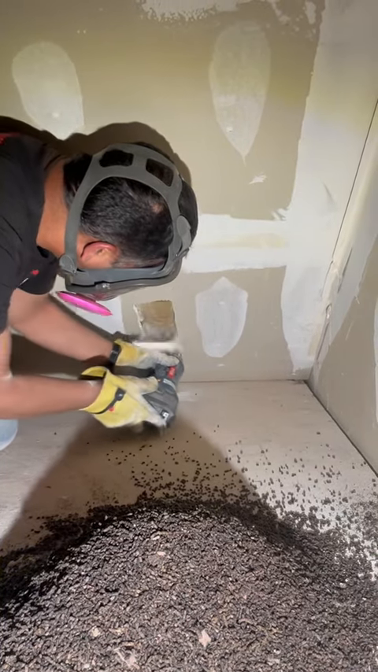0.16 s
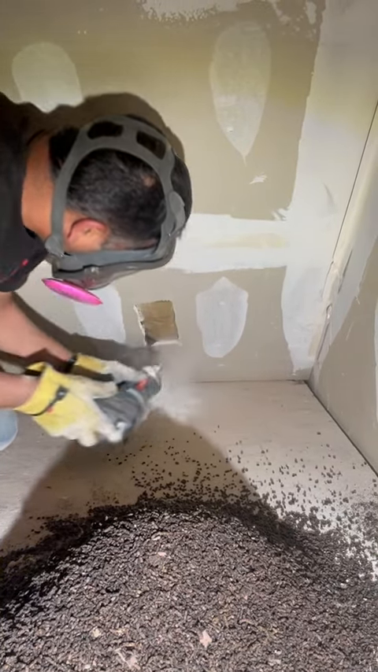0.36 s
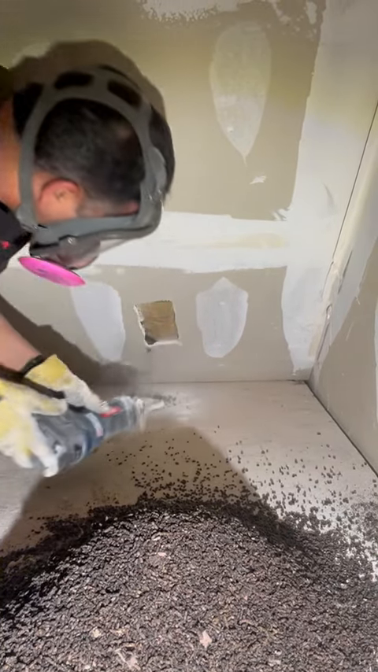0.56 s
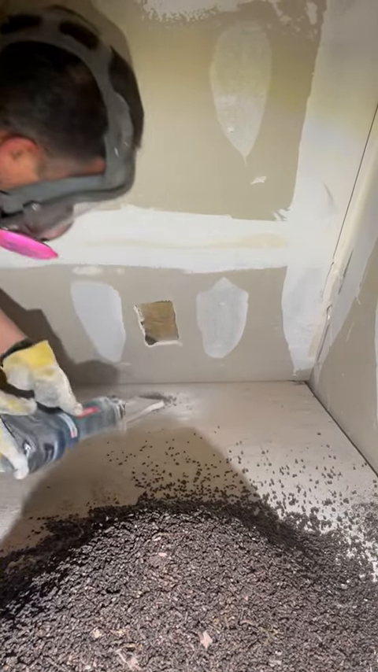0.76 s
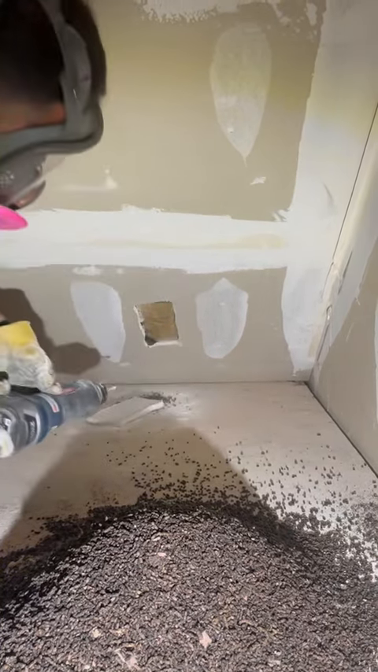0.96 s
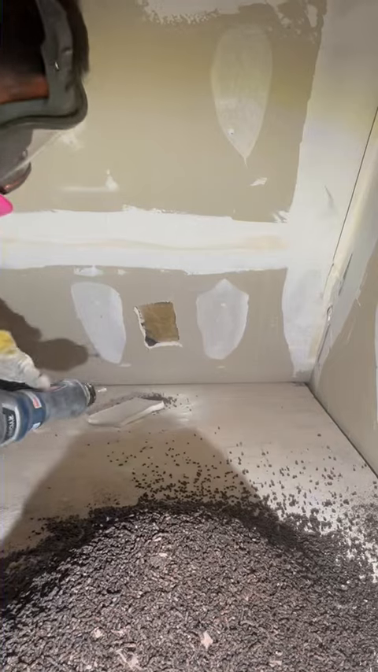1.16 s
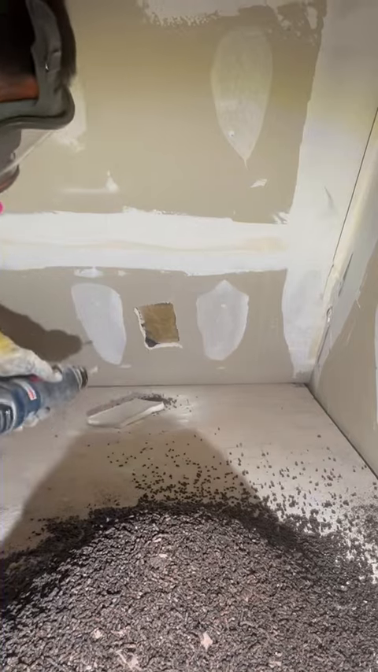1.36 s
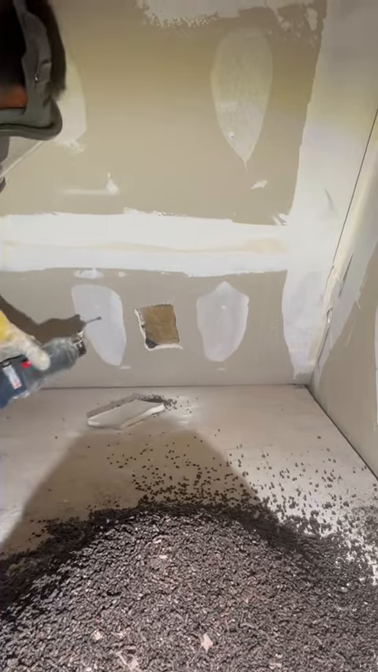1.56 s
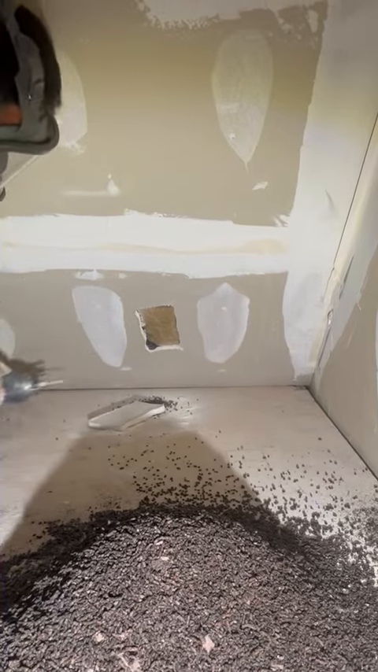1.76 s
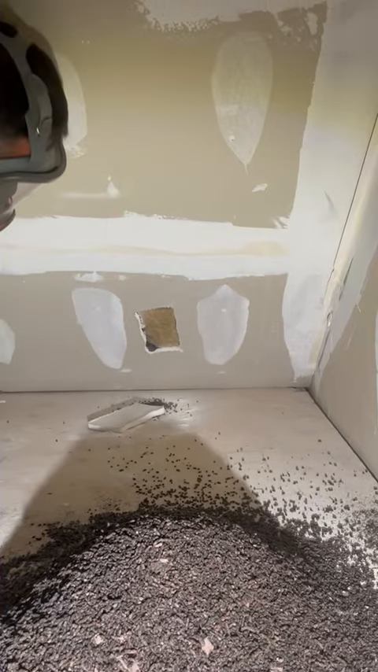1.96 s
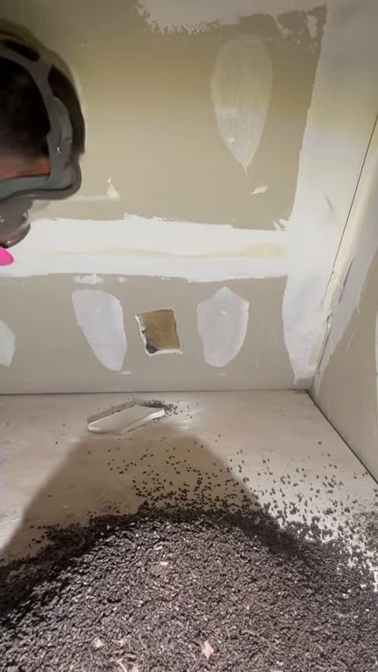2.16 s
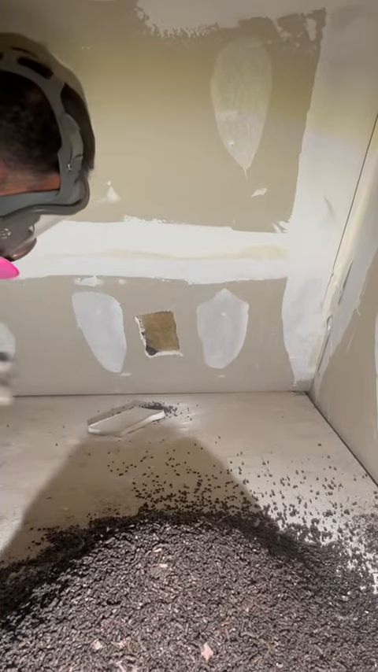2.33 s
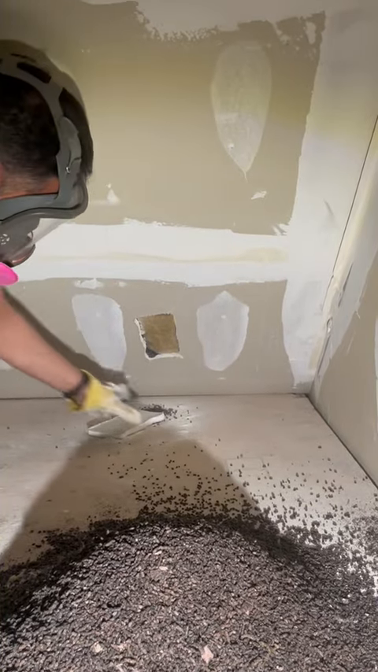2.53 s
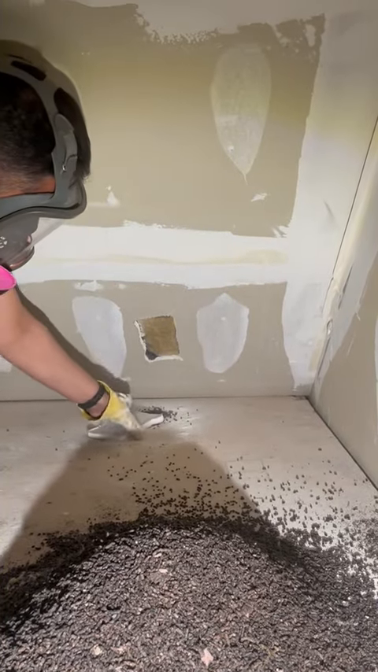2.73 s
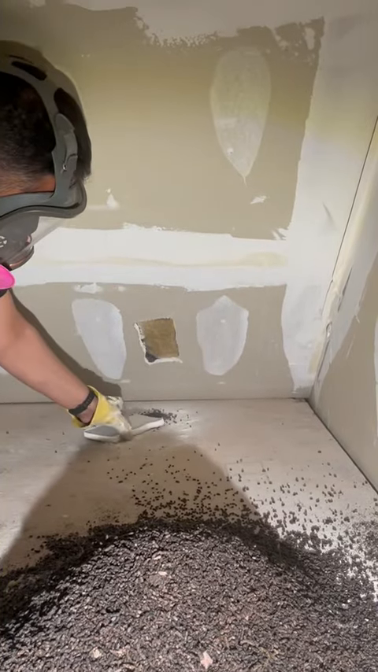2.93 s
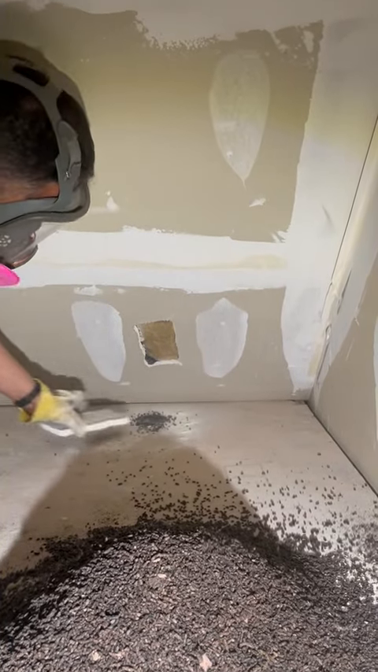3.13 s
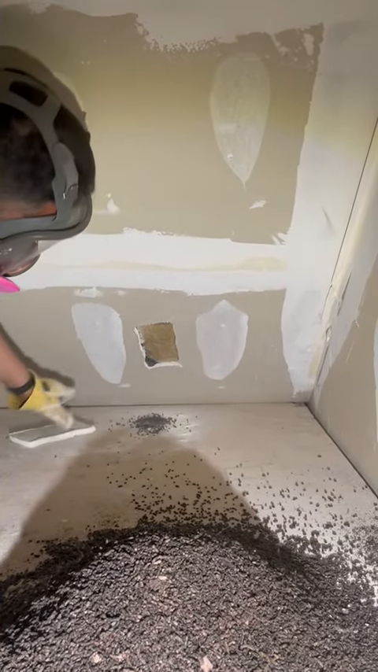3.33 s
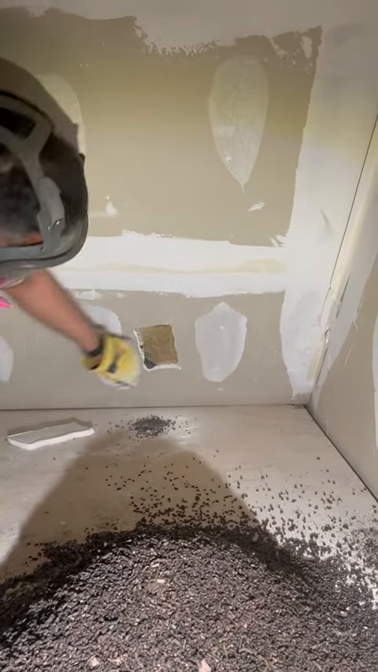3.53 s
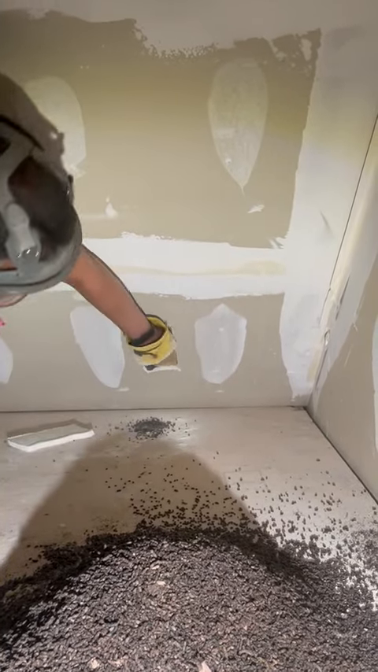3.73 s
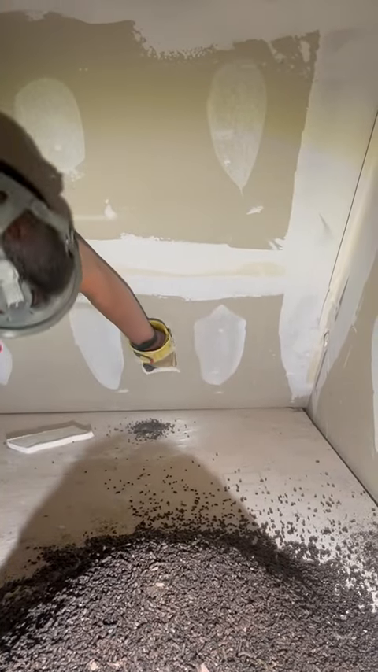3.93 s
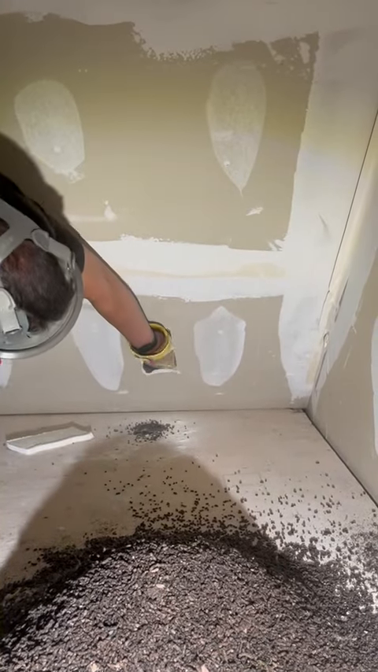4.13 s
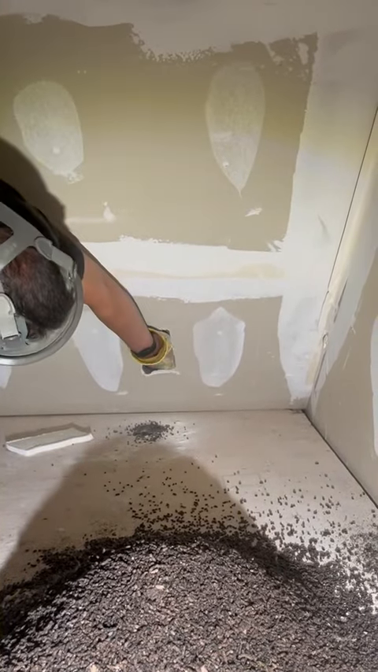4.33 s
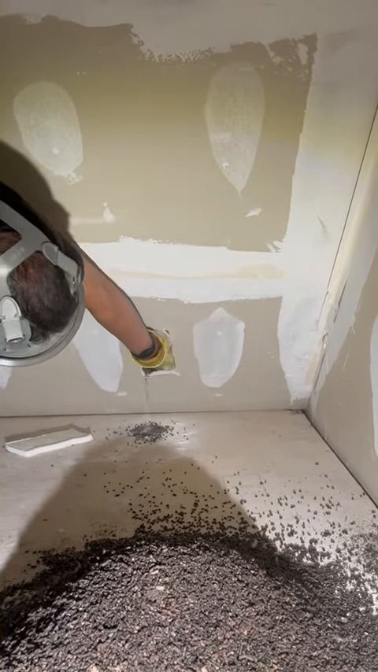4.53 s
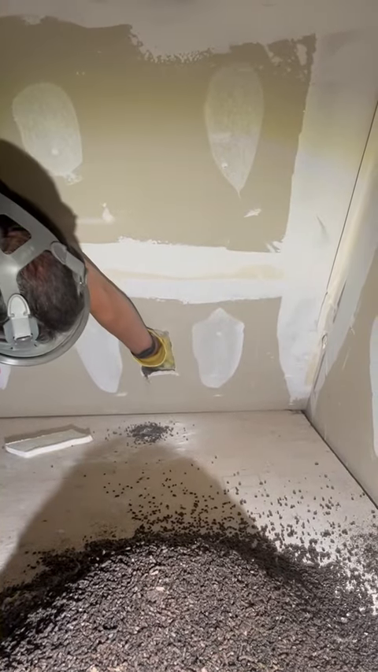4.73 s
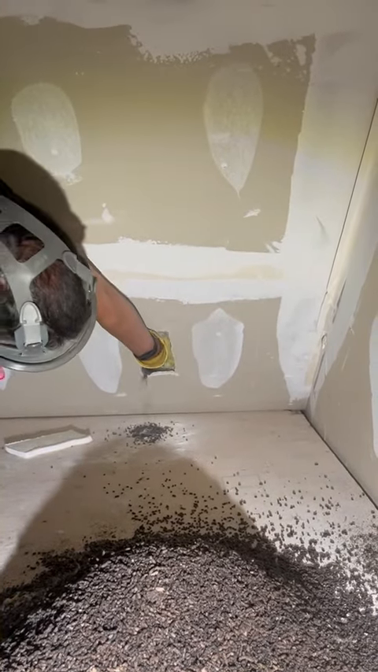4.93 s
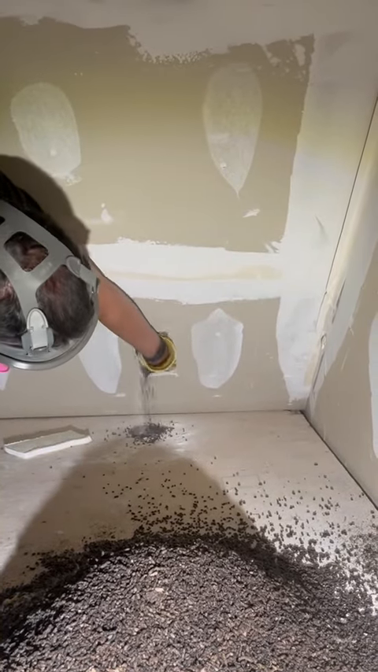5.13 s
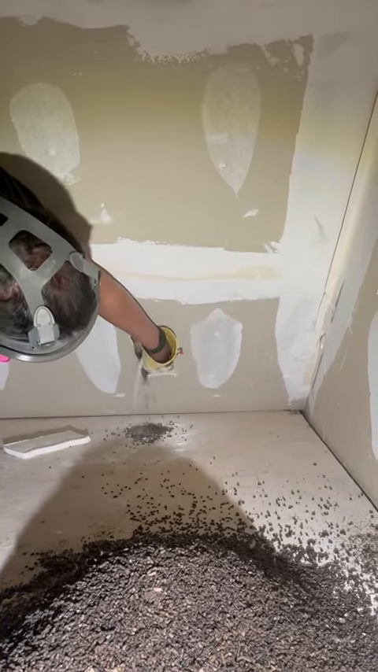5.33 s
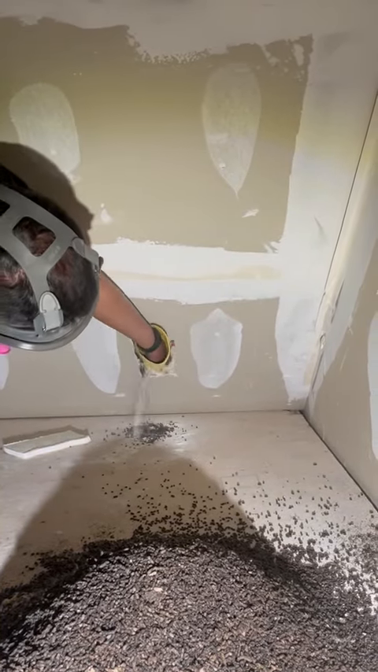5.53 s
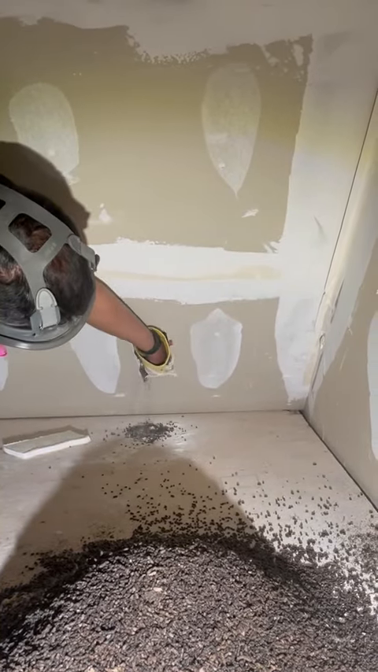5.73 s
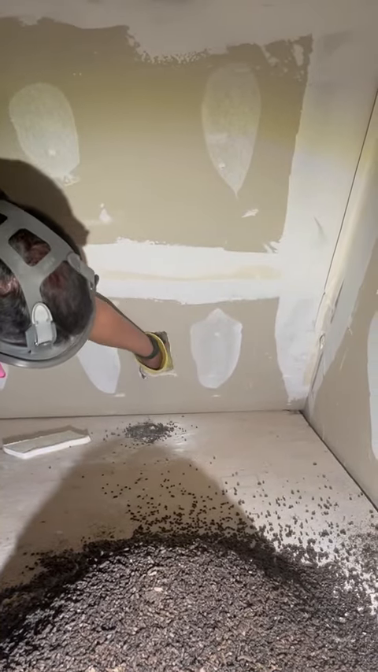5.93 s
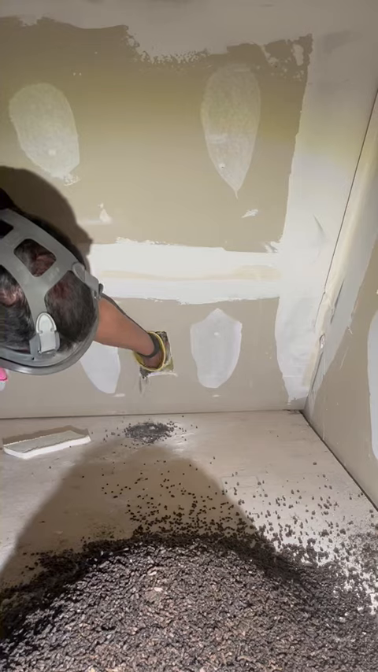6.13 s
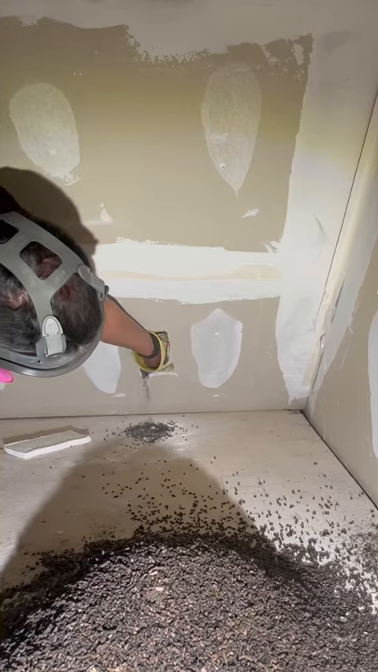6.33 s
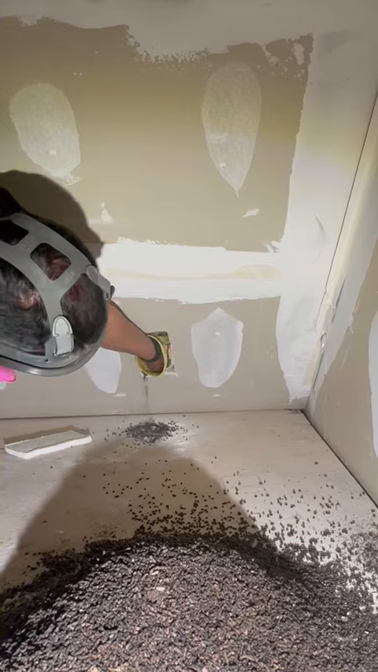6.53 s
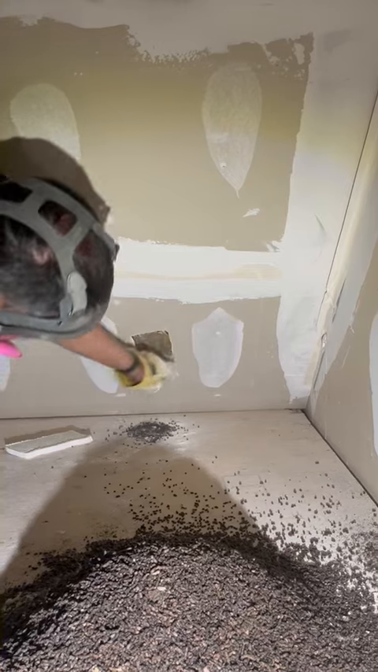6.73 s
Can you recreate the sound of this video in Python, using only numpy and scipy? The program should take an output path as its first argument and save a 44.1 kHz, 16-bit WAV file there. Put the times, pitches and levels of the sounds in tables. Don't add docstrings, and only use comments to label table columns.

```python
import sys
import numpy as np
from scipy import signal
from scipy.fft import rfft, irfft, next_fast_len
from scipy.io import wavfile
from scipy.ndimage import uniform_filter1d

SR = 44100
rng = np.random.default_rng(int(sys.argv[2]) if len(sys.argv) > 2 else 0)


def invert_db(level):
    return 10 ** (np.asarray(level, dtype=float) / 20)


def transcribe(u):
    v = np.clip(np.atleast_2d(u).T, -1, 1)
    q = np.round(v * 32767).astype(np.int16)
    wavfile.write(sys.argv[1], SR, q)


N = 298976

BLADES = 15
FULL_HZ, RECOVER_HZ, RECOVER_S = 473.6, 20, .085
OFF_S, CURRENT_DIES_S = 0.894, 0.055
STOP_S, STOP_DB_PER_S = 3.76, 108.5
BLUR_FROM, WEAK_BLUR_FROM, BLUR_DB, COAST_WAVER = .655, .56, 150, .5
LOOSE_S, LOOSE_LENGTH_S, LOOSE_DB, LOOSE_DB_PER_S, GRIPPED_DB = 1.563, 0.19, -2.5, 130, -9
RUB_RISE, RUB_FALL, RUB_FLOOR_DB = 110, 162, -69.5
BUILD_MS, CRACK_PER_HARDNESS = 10.4, 1.78
GLOVE_RISE, GLOVE_FALL, SPILL_RISE, SPILL_FALL = 260, 97, 190, 97
TRICKLE_S, TRICKLE_DB = 3.7, -73.5
DUST_DB, DUST_PER_SPILL = -91, 1.17
ROOM_T60_S, SHARED_ECHO_DB = 0.38, -9

# [t/s, rate/turns per s]
COAST_SPEED = [(0.87, 473.6), (0.93, 458.1), (1, 437.3), (1.15, 402.2), (1.5, 338.6), (1.9, 267.0),
               (2.4, 196.7), (2.9, 134), (3.9, 40)]
# [t/s, unbalance/dB, magnetic hum/dB, housing ring/dB, vent whine/dB]
HELD_LEVELS = [(0.0, -44, -48, -61, -37), (0.16, -35.5, -33.5, -37, -36), (0.25, -38, -35, -31.5, -37.5),
               (0.35, -34.5, -24, -34, -38), (0.47, -41.5, -32, -41.5, -26.5),
               (0.52, -50, -50.5, -41.5, -28), (0.6, -40, -34.5, -33, -27.5), (0.75, -41, -44.5, -39, -31),
               (0.87, -34.5, -33.5, -37, -30.5)]
# [multiple of rate, level/dB, lost with current/dB, lost from full speed to rest/dB, waver/dB]
CLEAN_ORDERS = [
    (1, 4.1, 14.1, 15.1, 1.5),
    (2, 3.4, 18.5, 33.4, 3.1),
    (3, -2, 8, 32, 2.9),
    (BLADES, 6.5, 5.25, 38.7, 5.3),
]
# [multiple of rate, level re motor noise/dB]
WEAK_ORDERS = [(4, -12), (5, -5), (6, -10.5), (7, -12.5), (8, -12.5), (12, -19.5), (24, -17.5), (30, -15),
               (36, -28), (48, -22.5)]
# [f/Hz, width/Hz, level/dB]
HOUSING_RINGS = [(1190, 36, 10), (1700, 100, -1), (2600, 100, 1.5), (2900, 200, -12.5), (5560, 2400, 17.5),
                 (9500, 300, 19.5)]
# [f/Hz, width/Hz, level/dB]
GRIP_RINGS = [(191, 51, 18), (270, 15, -11), (309, 10, 5.5), (408, 21, -8.5), (432, 22, 10), (800, 60, 8)]
# [level at full speed/dB, lost from full speed to rest/dB]
NOISE_LAYERS = [
    (-42.5, 19),
    (-38.5, 27.5),
    (-41, 35),
    (-56, 17),
]
NOISE_LAYERS_HZ = [900, 2200, 5000, 11000]
# [f/Hz, level/dB relative to its layers]
MOTOR_SPECTRUM = [(100, -30.5), (300, -20.5), (520, -13.5), (800, -5.5), (1300, -4), (2000, -0.5),
                  (3000, -3.5), (4200, 3), (6000, 2.5), (7500, 1.5), (10500, 8.5), (13000, -24.5),
                  (15500, 3)]
# [t/s, level/dB]
NEARNESS = [(0, -1.5), (.2, 1.5), (.44, -1.5), (.78, 0.5), (1.07, 1.5), (1.4, -0.5), (1.77, 3), (2.5, 3),
            (3.4, 5)]
# [t/s, whine level/dB]
VENT_AIM = [(.9, -1), (1.0, -0.5), (1.35, 7.5), (1.5, 5), (1.7, 3), (2.05, -5), (2.45, 2.5), (2.63, -1),
            (2.72, -12)]
# [t/s, length/s, level/dB]
FLOOR_RUBS = [
    (0.0, 0.0078, -47.5),
    (0.478, 0.06, -35),
    (1.608, 0.23, -61),
    (2.08, 0.65, -51),
    (2.594, 0.12, -38),
    (2.84, 0.26, -45),
    (3.342, 0.057, -48),
    (3.69, .05, -55),
]
# [f/Hz, level/dB relative to the rub]
RUMBLE_SPECTRUM = [(15, -44), (25, -31.5), (60, 1.5), (160, -5.5), (198, -8), (315, -9.5), (445, -17),
                   (900, -28.5), (1170, -47.5), (1980, -120)]
# [t/s, peak/dB, pitch f/Hz, hardness/dB]
BLOWS = [(0.134, -40.5, 159, 9), (0.3, -12, 175, -7.5), (0.349, -13.5, 202, 0), (0.369, -12, 159, -5),
         (0.391, -31.5, 187, -9), (0.487, -23, 120, 2.5), (1.603, -48.5, 165, -56),
         (2.021, -10.5, 179.9, -15), (2.056, -14, 163.5, -33.5), (2.1, -27.5, 138, -23),
         (2.512, -6, 168.7, -18), (2.557, -18.5, 188, -9.5), (2.681, -15, 179, -15),
         (2.722, -12, 156, -30.5), (2.754, -30.5, 154, -2.5), (2.881, -15, 164.2, -15),
         (2.907, -19, 157, -10), (3.197, -20.5, 172, -21.5), (3.251, -21.5, 263, -11.5)]
# [t/s, peak/dB, pitch f/Hz, hardness/dB]
BUMPS = [(3.514, -42, 151, -6.5), (3.633, -40.5, 82, -27), (3.659, -37.5, 63.3, -31),
         (3.832, -36, 67.7, -4), (3.859, -30, 70.0, -20), (4.007, -51.5, 270, 3), (4.05, -41.5, 151, -7.5),
         (4.248, -44.5, 183, -8), (4.508, -38.5, 266, -9.5), (4.949, -46.5, 171.4, -5.5),
         (5.297, -53, 261, -0.5), (5.415, -59, 140, -6), (5.502, -51.5, 75.4, -24),
         (6.637, -40.5, 252, -6.5)]
# [f/Hz, level/dB, t60/s]
FLOOR_MODES = [(70, -6, 0.21), (101.2, -18.5, 0.57), (141.1, -5, 0.34), (175.4, 1.5, 0.2),
               (180, -10.5, 0.077), (250.6, -2.5, 0.059)]
# [f/Hz, level/dB, t60/s]
PIECE_MODES = [(297.2, 3.5, 0.11), (355.8, 5.5, 0.05), (454, -19, 0.21), (552.4, -5, 0.12),
               (631.7, -13.5, 0.27), (820, -21.5, 0.18), (1083, -7.5, 0.062)]
# [t/s, length/s, glove level/dB, spill level/dB]
RAKE_STROKES = [(3.81, 0.038, -43, -55.5), (4.01, .01, -42, -85.5), (4.085, 0.0092, -46.5, -59.5),
                (4.253, 0.077, -44, -58.5), (4.475, 0.017, -45.5, -56), (4.546, 0.24, -47.5, -64),
                (4.86, .08, -68, -68), (4.97, 0.2, -54, -64), (5.315, 0.054, -67.5, -68),
                (5.409, 0.0074, -53, -75), (5.54, 0.028, -53, -65.5), (5.853, .15, -44.5, -79.5),
                (5.913, 0.013, -59, -56), (6.197, 0.16, -53, -67), (6.543, 0.063, -45.5, -63.5),
                (6.613, 0.012, -48.5, -67.5)]
# [f/Hz, level/dB relative to patter and hiss]
PATTER_SPECTRUM = [(300, 1), (700, -3), (1200, 1.5), (2000, 2.5), (3000, 3.5), (4500, 9.5), (6000, 12.5),
                   (8000, 14.5), (10500, 17), (13000, -3), (15500, -18.5)]
# [t/s, peak/dB, f/Hz, snap level/dB]
LONE_PELLETS = [(3.7999, -38, 2500, -53), (3.9173, -34.5, 2700, -62), (4.0136, -35.5, 1320, -73),
                (4.0675, -35, 1334, -59.5), (4.178, -42, 2500, -75), (4.2541, -34, 5760, -63),
                (4.463, -40, 5700, -67.5), (4.4752, -41, 2470, -67), (4.752, -48, 2570, -59),
                (4.9555, -56, 2630, -92), (5.058, -47, 3960, -58), (5.1341, -44, 1920, -78.5),
                (5.1626, -44, 2360, -76), (5.3091, -44, 2270, -70), (5.3845, -50, 4020, -78.5),
                (5.4198, -44.5, 1450, -86), (5.524, -49, 1394, -87), (5.573, -49.5, 2610, -64.5),
                (5.692, -50.5, 1460, -66), (5.7117, -51, 5140, -85.5), (5.8506, -38.5, 2140, -78),
                (5.886, -40.5, 3860, -88), (5.9639, -38, 3000, -55.5), (6.2906, -51, 2490, -58),
                (6.3243, -49.5, 2170, -74.5), (6.5354, -48.5, 1220, -85.5), (6.6775, -45, 3610, -68)]
# [f/Hz, level/dB]
UNLIKE_ECHOES = [(100, -49), (250, -26), (450, -10), (800, -5.5), (1300, -5), (2000, -14.5), (3200, -3.5),
                 (4500, -4.5), (5500, -5.5), (6300, -14), (7200, -16.5), (15500, -4.5)]
# [f/Hz, lead/half cycles between ports]
PORT_LEAD = [(500, 0), (950, -.24), (1300, -.1), (2000, 0), (3700, .4), (4500, .45), (4900, -.05),
             (5700, .05), (6500, .45), (6900, .8), (7100, .84), (7300, 1), (8600, 1), (10000, 2),
             (12000, 2), (13200, 3), (15100, 3), (15800, 3.25)]


def rms_one(x):
    return x / np.sqrt(np.mean(x ** 2) + 1e-20)


def in_time(rows):
    s, *columns = np.transpose(rows)
    return [np.interp(np.arange(N) / SR, s, column) for column in columns]


def at_hz(points, hz):
    points_hz, points_db = np.transpose(points)
    return np.interp(np.log(hz + 1), np.log(points_hz), points_db)


def drift(rate):
    pole = np.exp(-80 * np.pi * rate / SR)
    white = rng.standard_normal(N // 40 + 2002)
    slow = signal.lfilter([1], [1, -2 * pole, pole * pole], white)[2000:]
    return np.interp(np.arange(N) / 40, np.arange(len(slow)), rms_one(slow))


def band(x, low_hz, high_hz):
    edges = [low_hz, min(high_hz, .45 * SR)]
    return signal.sosfilt(signal.butter(2, edges, "band", fs=SR, output="sos"), x)


def banded(white, spectrum, curves_db, anchors_hz, patchy_db):
    out, together = 0, drift(8.7)
    edges = 25 * 2 ** np.arange(0, 9.6, .5)
    for k, (low, high) in enumerate(zip(edges, edges[1:])):
        hz = np.sqrt(low * high)
        place = np.interp(np.log(hz), np.log(anchors_hz), np.arange(len(anchors_hz)))
        i = min(int(place), len(anchors_hz) - 2)
        level_db = curves_db[i] + (place - i) * (curves_db[i + 1] - curves_db[i])
        width = np.sqrt((high - low) / np.clip(hz, anchors_hz[0], anchors_hz[-1]))
        flicker_db = patchy_db * (0.6 * together + 0.71 * drift(27))
        noise = rms_one(band(white[k % 2], low, high))
        out = out + invert_db(level_db + at_hz(spectrum, hz) + flicker_db) * width * noise
    return out


def swells(starts, lengths, tops_db, rise, fall, floor_db):
    t, power = np.arange(N) / SR, invert_db(2 * floor_db)
    for s, length, top_db in zip(starts, lengths, tops_db):
        before, after = np.maximum(s - t, 0), np.maximum(t - s - length, 0)
        power = power + invert_db(2 * (top_db - rise * before - fall * after))
    return 10 * np.log10(power)


def lift(rings, hz):
    return sum(db / (1 + ((hz - centre) / width) ** 2) for centre, width, db in rings)


def struck(modes, t):
    hz, level_db, t60 = np.transpose(modes)[:, :, None]
    gains = invert_db(level_db + rng.normal(0, 3.2, hz.shape)) * rng.choice([-1, 1], hz.shape)
    ring = np.sum(gains * invert_db(-60 * t / t60) * np.sin(2 * np.pi * hz * t), axis=0)
    return ring / np.abs(ring).max()


def add(track, s, sound):
    i = round(s * SR)
    track[i:i + len(sound)] += sound[:N - i]


def motor():
    t = np.arange(N) / SR
    turns = in_time(COAST_SPEED)[0] - RECOVER_HZ * np.exp(-t / RECOVER_S)
    slowed = 1 - turns / FULL_HZ
    unpowered = 1 - np.exp(-np.maximum(t - OFF_S, 0) / CURRENT_DIES_S)
    near_db = in_time(NEARNESS)[0] - STOP_DB_PER_S * np.maximum(t - STOP_S, 0)
    blur_db = BLUR_DB * np.maximum(slowed - BLUR_FROM, 0)
    weak_blur_db = BLUR_DB * np.maximum(slowed - WEAK_BLUR_FROM, 0)
    angle = 2 * np.pi * np.cumsum(turns * (1 + .0005 * drift(25))) / SR

    noise_db = [db - loss * slowed + near_db for db, loss in NOISE_LAYERS]
    out = banded(rng.standard_normal((2, N)), MOTOR_SPECTRUM, noise_db, NOISE_LAYERS_HZ, patchy_db=2.0)
    buzz_db = swells([LOOSE_S], [LOOSE_LENGTH_S], [LOOSE_DB], LOOSE_DB_PER_S, LOOSE_DB_PER_S,
                     GRIPPED_DB - 3 * unpowered)

    for (k, db, off, loss, waver), held_db in zip(CLEAN_ORDERS, in_time(HELD_LEVELS)):
        k = round(k)
        level_db = held_db + db - off * unpowered - loss * slowed - blur_db
        level_db = level_db + unpowered * lift(GRIP_RINGS, k * turns)
        if k == 3:
            level_db = level_db + buzz_db - GRIPPED_DB
        if k == BLADES:
            level_db = level_db + in_time(VENT_AIM)[0]
        out += invert_db(level_db + waver * drift(14.7)) * np.sin(k * angle + k)
    out += invert_db(level_db - 28.5 + 3.6 * drift(8.8)) * np.sin(2 * BLADES * angle)

    for k, db in WEAK_ORDERS:
        source_db = noise_db[1] + buzz_db if k < BLADES else noise_db[3]
        level_db = source_db - weak_blur_db + db + lift(HOUSING_RINGS, k * turns)
        waver_db = 2.78 * (1 + COAST_WAVER * unpowered) * drift(9.8)
        out += invert_db(level_db + waver_db) * np.sin(round(k) * angle + k)
    return out


def rumble():
    s, length, db = np.transpose(FLOOR_RUBS)
    rub_db = swells(s, length, db, RUB_RISE, RUB_FALL, RUB_FLOOR_DB)
    start, hold, glove_db, _ = np.transpose(RAKE_STROKES)
    level_db = swells(start, hold, glove_db - 10, GLOVE_RISE, GLOVE_FALL, rub_db)
    white = rng.standard_normal((2, N))
    return invert_db(4.5) * banded(white, RUMBLE_SPECTRUM, [level_db, level_db - 23], [600, 3000], patchy_db=6.0)


def blows():
    out, t = np.zeros(N), np.arange(SR // 2) / SR
    for s, peak_db, pitch_hz, hard_db in BLOWS + BUMPS:
        build = np.sin(np.pi / 2 * np.minimum(1000 * t / BUILD_MS, 1)) ** 2
        pitched = invert_db(-60 * t / 0.12) * np.sin(2 * np.pi * pitch_hz * t)
        body = 0.59 * struck(FLOOR_MODES, t) + 1.01 * pitched
        sweep = 2 * np.pi * 250 * (t + 2.5 * .004 * (1 - np.exp(-t / 0.0056)))
        thud = np.sin(sweep) * invert_db(-60 * t / 0.032) * (1 - np.exp(-t / 0.0007))
        noise = rng.standard_normal((2, len(t)))
        dying = invert_db(-60 * t / 0.53) * (1 - np.exp(-t / 0.0079))
        low = build * body + 0.14 * thud + invert_db(-2) * band(noise[0], 50, 277) * dying
        knock = struck(PIECE_MODES, t) * np.sqrt(build) + 0.29 * thud
        knock = knock + invert_db(-8) * band(noise[0], 170, 900) * dying
        crack = band(noise[1], 350, 4900) * invert_db(-60 * t / 0.042)
        blow = invert_db(peak_db) * low + invert_db(peak_db + hard_db + 3.0) * knock
        add(out, s, blow + invert_db(peak_db + CRACK_PER_HARDNESS * hard_db - 4.5) * crack)
    return out


def pellets():
    start, hold, _, spill_db = np.transpose(RAKE_STROKES)
    begins_db = 100 * np.minimum(np.arange(N) / SR - TRICKLE_S, 0)
    patter_db = swells(start, hold, spill_db, SPILL_RISE, SPILL_FALL, TRICKLE_DB + begins_db)
    hiss_db = DUST_DB + DUST_PER_SPILL * (patter_db + 68.5)
    sizes = invert_db(5.74 * np.minimum(rng.exponential(1, N), 5)) * rng.choice([-1, 1], N)
    falls = rng.random(N) < 1500 * invert_db(5 * drift(25)) / SR
    grains = sizes * falls + 0.52 * rng.standard_normal((2, N))
    curves_db = [patter_db - 2, patter_db - 4.0, hiss_db - 2]
    out = banded(grains, PATTER_SPECTRUM, curves_db, [600, 3000, 11000], patchy_db=3.0)

    t = np.arange(SR // 20) / SR
    for s, peak_db, hz, snap_db in LONE_PELLETS:
        noise = rng.standard_normal(len(t)) * invert_db(-60 * t / 0.02)
        tick = 0.95 * np.sin(2 * np.pi * hz * t) * invert_db(-60 * t / 0.017)
        tick = tick + band(noise, 1100, 5500) + 0.36 * band(noise, hz / 5.0, hz * 3.2)
        snap = band(noise, 4500, 14000)
        add(out, s, invert_db(peak_db - 7.5) * tick + invert_db(snap_db + 6.5) * snap)
    return out


def bare_room(dry):
    size, t = next_fast_len(N + SR), np.arange(SR // 2) / SR
    hz = np.fft.rfftfreq(size, 1 / SR)
    tails = rng.standard_normal((2, len(t))) * invert_db(-60 * t / ROOM_T60_S) * (t > .004)
    shared, unlike = rfft(tails / np.sqrt(np.sum(tails ** 2, axis=1, keepdims=True)), size)
    shared_gain = invert_db(SHARED_ECHO_DB) * hz / (hz + 500)
    shared *= shared_gain
    unlike *= invert_db(at_hz(UNLIKE_ECHOES, hz))
    response = (1 + shared + unlike * [[1], [-1]]) / np.sqrt(1 + shared_gain ** 2)
    return irfft(rfft(dry, size) * response, size)[:, :N]


def scene():
    return bare_room(motor() + rumble() + blows() + pellets())


def roll_off(x):
    return signal.sosfilt(signal.butter(12, 15780, fs=SR, output="sos"), x)


def record(dry):
    size = next_fast_len(N + 4096)
    hz = np.fft.rfftfreq(size, 1 / SR)
    lead = uniform_filter1d(np.interp(hz, *np.transpose(PORT_LEAD)), size=800) * np.pi / 2
    lean_db = 1.0 * np.exp(-np.log((hz + 1) / 650) ** 2 / .8)
    left_right = np.array([[1], [-1]])
    ports = invert_db(lean_db * left_right) * np.exp(1j * lead * left_right) * (hz < 15830)
    x = irfft(rfft(dry, size) * ports, size)[:, :N]
    x = signal.sosfilt(signal.butter(2, 42, "high", fs=SR, output="sos"), x)
    return roll_off(x)


dry = scene()
out = record(dry)
transcribe(out)
```